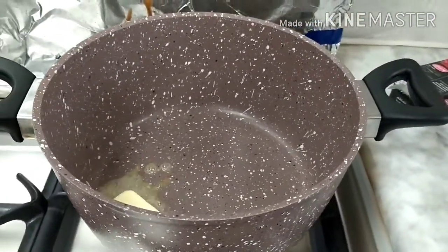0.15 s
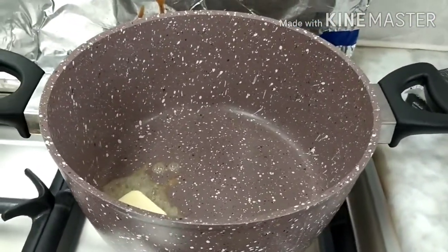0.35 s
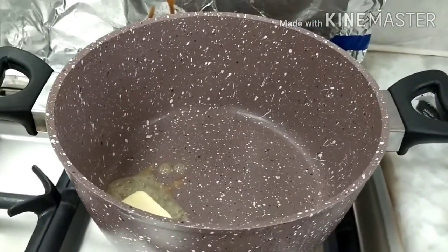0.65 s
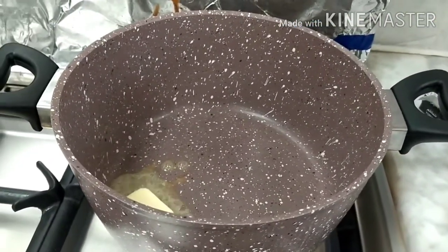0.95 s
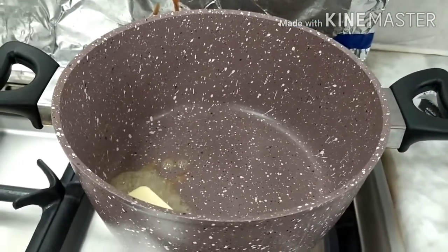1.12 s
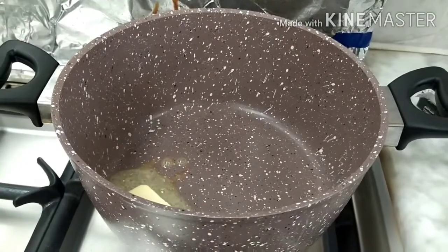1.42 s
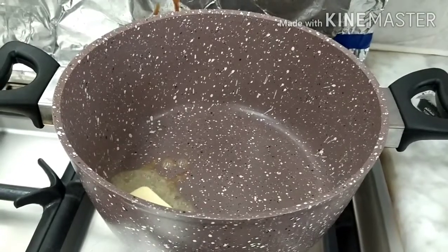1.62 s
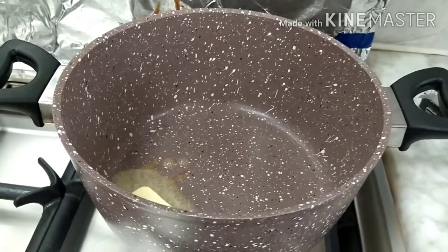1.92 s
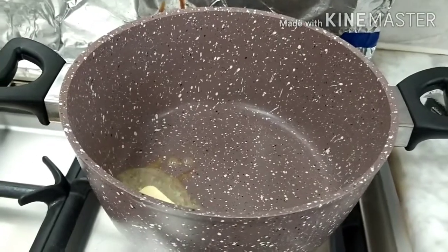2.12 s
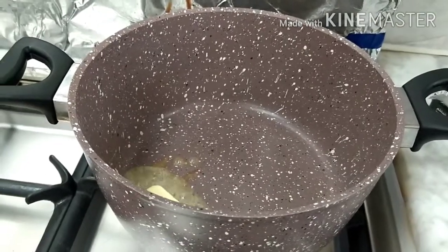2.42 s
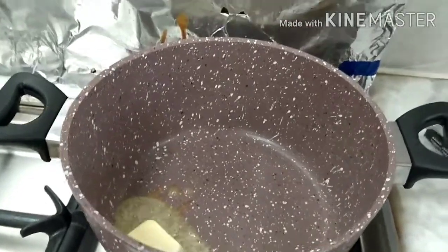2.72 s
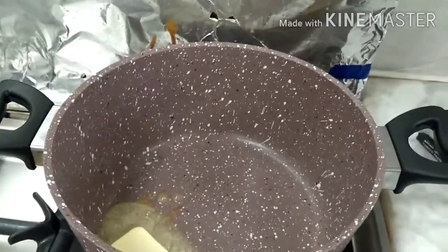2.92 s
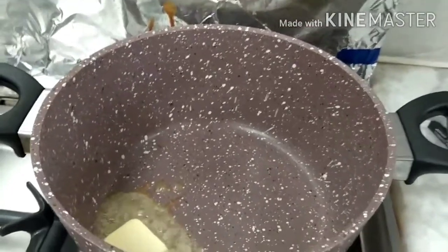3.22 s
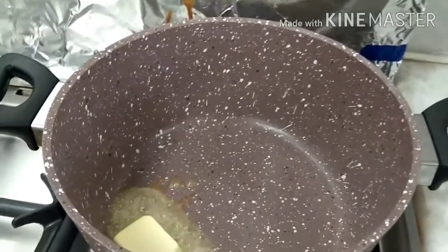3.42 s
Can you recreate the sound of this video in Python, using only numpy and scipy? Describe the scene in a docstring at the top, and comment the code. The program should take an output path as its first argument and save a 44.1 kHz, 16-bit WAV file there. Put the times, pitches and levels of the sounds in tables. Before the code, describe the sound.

Butter sizzles in a deep pot on a gas stove, heard from just above. The fine, bright hiss stays steady throughout, with tiny snaps and occasional small bubble pops over a faint low rumble of flame and kitchen.

```python
"""Butter sizzling in a pot

Butter melts in a hot, deep pot on a gas stove, heard from above by a hand-held phone's two microphones.
Thousands of tiny steam bubbles burst each second, and the air in the pot rings with their sizzle.
Some snap out of the hiss, ringing each microphone port at its own high pitch; larger ones plop.
Underneath, the flame and kitchen rumble and hum, and a few soft thuds come through the stove."""
import sys
import numpy as np
from scipy import signal
from scipy.fft import rfft, irfft
from scipy.io import wavfile

SR = 44100
rng = np.random.default_rng(int(sys.argv[2]) if len(sys.argv) > 2 else 0)


def materialize(psi):
    """Save the field psi as 16-bit PCM at rate SR to the path in sys.argv[1].

    A 1-D psi becomes a single channel; in a 2-D psi each row is a channel.
    """
    bounded = np.clip(np.atleast_2d(psi).T, -1, 1)
    quanta = np.round(bounded * 32767).astype(np.int16)
    wavfile.write(sys.argv[1], SR, quanta)


N = 156555
CUTOFF_HZ = 15750


def from_db(db):
    """Decibels to gain."""
    return 10 ** (np.asarray(db) / 20)


def unit_rms(x):
    """Scale to an rms of 1."""
    return x / np.sqrt(np.mean(x ** 2) + 1e-20)


def at_hz(rows, hz):
    """Read a table's columns along a log-frequency axis."""
    table_hz, *columns = np.transpose(rows)
    return np.array([np.interp(np.log(np.maximum(hz, 1)), np.log(table_hz), c) for c in columns])


def drift(corner_hz):
    """A smooth random wobble with a spread of 1, mostly slower than corner_hz."""
    step, warm_up = 20, 2000
    pole = np.exp(-2 * np.pi * corner_hz * step / SR)
    noise = rng.standard_normal(N // step + warm_up + 2)
    slow = signal.lfilter([1], [1, -2 * pole, pole ** 2], noise)[warm_up:]
    return np.interp(np.arange(N) / step, np.arange(len(slow)), unit_rms(slow - slow.mean()))


def equalise(x, curve):
    """Minimum-phase EQ from a curve with one dB column per channel."""
    size = 8192
    curve_db = at_hz(curve, np.arange(size // 2 + 1) * SR / size)
    cepstrum = irfft(curve_db * np.log(10) / 20, size)
    cepstrum[:, 1:size // 2] *= 2
    cepstrum[:, size // 2 + 1:] = 0
    impulse = irfft(np.exp(rfft(cepstrum)), size)
    return signal.fftconvolve(x, impulse, axes=-1)[:, :N]


# Bubble texture by pitch; hiss_share and the hiss's stereo_likeness run from 0 to 1:
# pitch_hz, bursts_per_s, size_spread_db, hiss_share, flicker_db, stereo_likeness
BUBBLE_GRAIN = [(630, 200, 2.5, 0.78, 1.05, .3), (1650, 300, 3.2, .64, 1, 0),
                (2555, 400, 3.6, 0.57, 0.9, .2), (4500, 1100, 2.5, .6, 1.2, .25),
                (6200, 1500, 2, 0.6, 1.4, .1), (9560, 1100, 3.2, 0.36, 1.2, .1),
                (13000, 2700, 1, 0.4, 1.5, .05)]
# Fader ride on the bubble bands below 5 kHz: time_s, lift_db
BODY_RIDE = [(0, -0.5), (.5, 0), (1, 0.5), (1.5, .5), (2.2, 1.3), (2.7, 0.5), (2.95, -1), (3.05, 0.9),
             (3.2, -0.1), (3.55, 1)]


def bubbles(scatter_s=.0005, flicker_hz=19):
    """Steam bubbles burst at random; each size rings in its own fifth of an octave over smooth hiss."""
    out = np.zeros((2, N))
    edges_hz = 350 * 2 ** np.arange(0, 5.7, 1 / 5)
    white = rng.standard_normal((2, 2, N))
    lift_db = np.interp(np.arange(N) / SR, *np.transpose(BODY_RIDE))
    for k, (low_hz, high_hz) in enumerate(zip(edges_hz, edges_hz[1:])):
        per_s, spread_db, hiss_share, flicker_db, alike = at_hz(BUBBLE_GRAIN, np.sqrt(low_hz * high_hz))
        when, size, polarity, place = rng.random((16000, 4))[:int(per_s * N / SR)].T
        strength = from_db(spread_db * np.minimum(-np.log(size + 1e-9), 3.8)) * np.sign(polarity - .5)
        # Bursts lie all over the puddle, so either microphone may hear one first.
        lag = (place - .5) * 2 * scatter_s * SR
        arrivals = np.clip([when * N + lag, when * N], 0, N - 1).astype(int)
        bursts = np.array([np.bincount(side, strength, N) for side in arrivals])
        left, other = white[k % 2]
        hiss = np.array([left, alike * left + np.sqrt(1 - alike ** 2) * other])
        mix = np.sqrt(1 - hiss_share) * unit_rms(bursts) + np.sqrt(hiss_share) * hiss
        band = signal.sosfilt(signal.butter(2, [low_hz, high_hz], "band", fs=SR, output="sos"), mix)
        out += band * from_db(flicker_db * drift(flicker_hz) + lift_db * (high_hz < 5000))
    return out


# Spits of droplets: start_s, length_s, boost_db, left_minus_right_db
SPATTER_CUES = [(.89, .012, 2, 2), (1.04, .03, 2, 3), (1.402, .012, 3.5, 4), (2.201, .009, 4, 5),
                (3.468, .016, 3, 4)]


def spatter_gain():
    """Each spatter of droplets briefly lifts the whole sizzle."""
    t = np.arange(N) / SR
    gain = np.ones((2, N))
    for start_s, length_s, boost_db, pan_db in SPATTER_CUES:
        boost = from_db([boost_db + pan_db / 2, boost_db - pan_db / 2])
        gain += np.outer(boost - 1, (t > start_s) & (t < start_s + length_s))
    return gain


# How hard the butter fries and how the phone is turned: time_s, relative_level_db, leftward_lean_db
FRYING_RIDE = [(0, -30.5, -4), (.4, -31, -5.5), (.8, -31, -5.5), (1.1, -30, -5.5), (1.4, -31, -6),
               (1.8, -31.5, -6), (2.2, -31, -5), (2.6, -31, -5.5), (2.95, -30, -5.5), (3.25, -31, -7),
               (3.55, -31.5, -7.5)]


def frying_gain(surge_db=.55, surge_hz=6.3, neutral_lean_db=-6):
    """The frying swells slowly and surges quickly; the turning phone shifts the balance."""
    t = np.arange(N) / SR
    time_s, level_db, lean_db = np.transpose(FRYING_RIDE)
    vigour_db = np.interp(t, time_s, level_db) + surge_db * drift(surge_hz)
    pan_db = np.interp(t, time_s, lean_db) - neutral_lean_db
    return from_db(vigour_db + np.outer([.5, -.5], pan_db))


# Relative tone of the sizzle, with a port peak high in each side: frequency_hz, left_db, right_db
SIZZLE_EQ = [(300, -45, -45), (550, -29, -28), (720, -24, -22), (900, -24, -26), (1300, -19.5, -14.5),
             (1580, -19, -14), (1750, -18.5, -11), (2050, -18, -10), (2400, -16.5, -7), (2700, -16.5, -7),
             (3000, -16, -7.5), (3600, -15, -8), (4100, -14.3, -9.3), (4500, -15.5, -10.6),
             (5200, -16.2, -10.8), (5550, -17.5, -13), (5800, -14.5, -11.5), (6200, -14, -12),
             (7200, -15, -11), (8000, -10, -7), (8600, -10, -1.5), (9000, -9, 3.5), (9400, -9, 4),
             (9800, -7, -2), (10400, -4, -7), (11000, -9, -11), (11400, -13, -13), (11700, -17, -16),
             (12400, -19.2, -18.5), (13500, -23, -22.3), (15000, -27, -26), (15700, -31, -31)]


def sizzle(makeup_db=5):
    """The bubble bed rides the frying and spatters, coloured as each microphone hears it."""
    bed = bubbles() * frying_gain() * spatter_gain()
    eq_gains = from_db(at_hz(SIZZLE_EQ, np.linspace(0, CUTOFF_HZ, num=2000)))
    eq_rms = np.sqrt(np.mean(eq_gains ** 2))
    return from_db(makeup_db) * equalise(bed, SIZZLE_EQ) / eq_rms


# Air resonances of the pot: pitch_hz, width_hz, left_boost_db, right_boost_db
POT_MODES = [(665, 33, 0, 1), (722, 51, 3, 3.5), (1579, 7.7, 9.5, 9.5), (2386, 74, 7.5, 4.5),
             (2950, 54, 4, 3.5)]


def pot_ring(x):
    """The air in the pot lifts a few narrow pitches."""
    for pitch_hz, width_hz, left_db, right_db in POT_MODES:
        pole = np.exp(-np.pi * width_hz / SR)
        feedback = [1, -2 * pole * np.cos(2 * np.pi * pitch_hz / SR), pole ** 2]
        ring = signal.lfilter(np.array([1, 0, -1]) * (1 - pole ** 2) / 2, feedback, x)
        x = x + (from_db([[left_db], [right_db]]) - 1) * ring
    return x


# Tone of the flame and kitchen: frequency_hz, relative_level_db
RUMBLE_EQ = [(20, -5), (60, -9.5), (78, -13.5), (100, -9), (135, -6.5), (210, -9.5), (350, -10.5),
             (600, -16.5), (1000, -26.5), (1500, -19.5), (4000, -75)]
# Stereo image of the rumble, from 0 (wide) to 1 (mono): frequency_hz, stereo_likeness
RUMBLE_IMAGE = [(40, 0.47), (160, 0.82), (300, 0.77), (600, 0.58), (1000, 0.1)]


def rumble(level_db=-55):
    """Flame and kitchen make a bed of low noise, largely alike in both microphones."""
    mid, side = rfft(rng.standard_normal((2, N)))
    alike = at_hz(RUMBLE_IMAGE, np.arange(N // 2 + 1) * SR / N)[0]
    noise = irfft(np.sqrt(1 + alike) * mid + np.sqrt(1 - alike) * side * [[1], [-1]], N)
    return from_db(level_db) * unit_rms(equalise(noise, [(hz, db, db) for hz, db in RUMBLE_EQ]))


# Low tones in the rumble: pitch_hz, pitch_spread_hz, level_db
HUM_TONES = [(50, 3.58, -67), (162.1, 3.4, -64), (186.7, 3.95, -63.5), (225.3, 11.63, -71.5)]


def hums(waver_db=3, waver_hz=11):
    """Low, centred hums waver in level and pitch."""
    out = np.zeros(N)
    for pitch_hz, spread_hz, level_db in HUM_TONES:
        rms = from_db(level_db + waver_db * drift(waver_hz))
        cycles = np.cumsum(pitch_hz + spread_hz * drift(waver_hz)) / SR
        out += rms * np.sqrt(2) * np.sin(2 * np.pi * cycles)
    return out


def pings(cues, right_lag_s=.00021):
    """One brief tone per cue swells and fades; the longer path to the right delays its phase there."""
    out = np.zeros((2, N + SR))
    for (start_s, peak_db, pitch_hz, pan_db, rise_cycles), phase in zip(cues, rng.random(len(cues))):
        start = int(start_s * SR)
        cycles = np.arange(int(5 * rise_cycles / pitch_hz * SR)) * pitch_hz / SR
        age = cycles / rise_cycles  # 1 at the peak
        envelope = (age * np.exp(1 - age)) ** 4
        for side, side_db in enumerate([min(pan_db, 0), min(-pan_db, 0)]):
            tone = np.sin(2 * np.pi * (cycles + phase - side * pitch_hz * right_lag_s))
            out[side, start:start + len(tone)] += from_db(peak_db + side_db) * envelope * tone
    return out[:, :N]


# Sharp treble snaps: start_s, peak_db, pitch_hz, left_minus_right_db, rise_cycles
SNAP_CUES = [(0.0787, -21, 10530, 11, 8), (0.1135, -1, 9140, -14, 8), (0.3089, -15, 9030, -20, 10),
             (0.3276, -15, 9320, -9, 7), (0.543, -15, 9250, -11, 13), (0.5702, -16, 10550, 2, 9),
             (0.5702, -13, 9400, -10, 13), (0.6738, -8, 9050, -20, 7), (0.6822, -19, 10620, 8, 13),
             (0.7363, -18, 10390, 20, 12), (0.8026, -14, 9150, -20, 9), (0.8912, -14, 9500, -6, 7),
             (0.8926, -11, 8980, -14, 6), (0.9074, -13, 9200, -3, 7), (0.9704, -14, 9220, -20, 5),
             (1.0685, -20, 10530, 7, 13), (1.0862, -15, 9440, -18, 10), (1.0912, -15, 9020, -20, 7),
             (1.1007, -12, 9350, -20, 13), (1.1078, -15, 9190, -15, 13), (1.123, -20, 10410, 2, 9),
             (1.1234, -10, 9080, -14, 7), (1.1402, -14, 8850, -20, 7), (1.1767, -12, 9700, -11, 11),
             (1.2064, -15, 9410, -14, 6), (1.2809, -13, 9290, -20, 10), (1.4043, -17, 9300, -1, 7),
             (1.4806, -15, 8820, -20, 7), (1.5506, -13, 9180, -20, 13), (1.6838, -14, 9270, -20, 10),
             (1.7537, -14, 9310, -14, 7), (1.8492, -12, 8530, -12, 5), (2.141, -13, 8960, -20, 9),
             (2.1671, -8, 9230, -14, 7), (2.2084, -13, 10070, 7, 7), (2.3967, -10, 9250, -20, 9),
             (2.4005, -11, 9530, -14, 10), (2.5105, -14, 9050, -20, 6), (2.5641, -15, 9510, -14, 7),
             (2.6958, -8, 9100, -13, 13), (2.7612, -11, 8870, -19, 8), (2.7868, -13, 8980, -11, 12),
             (2.82, -14, 9250, -16, 7), (2.8416, -7, 8910, -20, 7), (2.9685, -13, 9520, -16, 9),
             (2.9786, -15, 9490, -17, 13), (2.9982, -14, 9410, -13, 8), (3.0387, -15, 9330, -11, 11),
             (3.0755, -14, 9250, -20, 13), (3.1029, -12, 9280, -15, 13), (3.1195, -10, 9030, -20, 9),
             (3.2269, -8, 9050, -20, 9), (3.2366, -11, 9120, -20, 9), (3.337, -13, 9540, -20, 7),
             (3.3509, -15, 9290, -20, 9), (3.3931, -15, 9100, -8, 6), (3.3952, -11, 8990, -14, 6),
             (3.4137, -12, 9040, -13, 7), (3.4373, -14, 8760, -9, 13), (3.4693, -15, 8860, -11, 6),
             (3.5066, -14, 9210, -14, 13)]


def snaps(crack_db=-12, low_cut_hz=5000):
    """A bubble's skin bursts with a bright crack, then the nearer microphone port rings up."""
    clicks = np.zeros((2, N))
    for start_s, peak_db, pitch_hz, pan_db, rise_cycles in SNAP_CUES:
        mid_rise_s = start_s + rise_cycles / pitch_hz / 2
        sides_db = np.minimum([pan_db / 2, -pan_db / 2], 0)
        clicks[:, int(mid_rise_s * SR)] += from_db(peak_db + crack_db + sides_db)
    low_cut = signal.butter(2, low_cut_hz, "high", fs=SR, output="sos")
    cracks = signal.sosfilt(low_cut, clicks + 1e-18)
    return cracks + pings(SNAP_CUES)


# Round plops: start_s, peak_db, pitch_hz, left_minus_right_db, rise_cycles
PLOP_CUES = [(.456, -46, 900, 0, 4), (.817, -43, 740, -9, 4.5), (1.339, -36, 1240, -8, 2.2),
             (1.99, -35, 1140, -3, 2.5), (2.2015, -30, 1500, 0, 2.5), (2.203, -28, 3400, 3, 7),
             (2.205, -28, 1650, 0, 3), (2.207, -39, 1080, -3, 5), (2.209, -24, 2050, -6, 5),
             (2.246, -34, 1300, 1, 2), (2.332, -25, 2650, 4, 3.6), (2.408, -30, 2140, -1, 2),
             (2.588, -36, 1020, 2, 3.1), (2.943, -36, 1010, 0, 2.6), (3.3945, -19, 5800, -2, 5),
             (3.468, -34, 1000, 0, 3), (3.471, -41, 745, 1, 5), (3.473, -36, 1000, 0, 3),
             (3.505, -23.5, 2320, -16, 3.4)]


def plops():
    """Larger bubbles ring lower, for just a few cycles."""
    return pings(PLOP_CUES)


# Soft, low thuds: start_s, gain_db, settled_pitch_hz, decay_s
THUD_CUES = [(.459, -38, 222, .022), (.496, -44, 180, .007), (1.053, -38, 330, .007),
             (2.192, -45, 170, .008), (2.234, -43, 170, .006)]


def thuds(rise_s=.004, sharp_share=.45, settle_s=.005):
    """Each thud through the stove starts sharp, drops to its pitch and dies away, dead centre."""
    out = np.zeros(N + SR)
    t = np.arange(SR // 5) / SR
    for start_s, gain_db, pitch_hz, decay_s in THUD_CUES:
        start = int(start_s * SR)
        cycles = pitch_hz * (t + sharp_share * settle_s * (1 - np.exp(-t / settle_s)))
        envelope = (1 - np.exp(-t / rise_s)) * np.exp(-t / decay_s)
        out[start:start + len(t)] += from_db(gain_db) * envelope * np.sin(2 * np.pi * cycles)
    return out[:N]


def scene():
    """Sizzle in the pot, snaps and plops on top, the stove and kitchen below."""
    return pot_ring(sizzle()) + snaps() + plops() + thuds() + rumble() + hums()


def record(dry):
    """A steep high cut takes off the very top."""
    return signal.sosfilt(signal.ellip(14, .5, 85, CUTOFF_HZ - 50, fs=SR, output="sos"), dry)


dry = scene()
out = record(dry)
materialize(out)
```